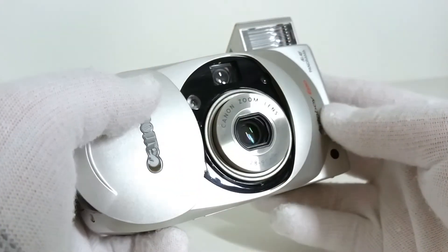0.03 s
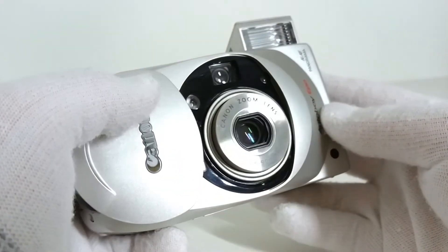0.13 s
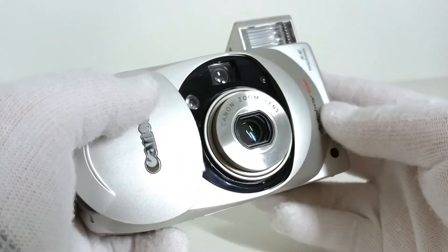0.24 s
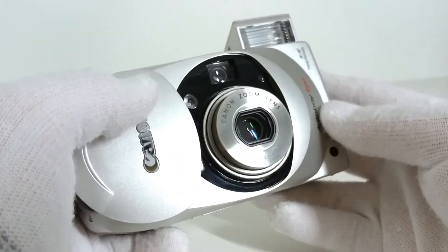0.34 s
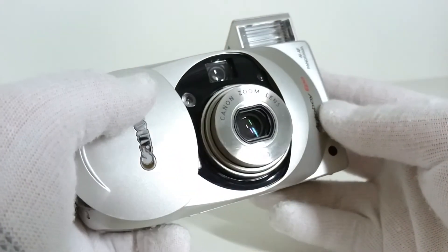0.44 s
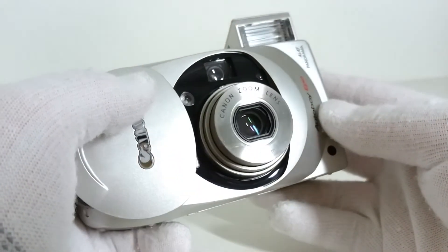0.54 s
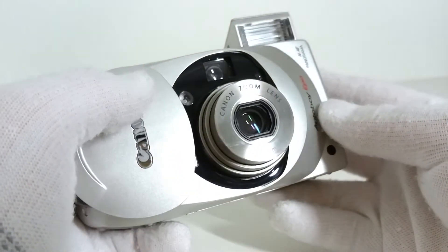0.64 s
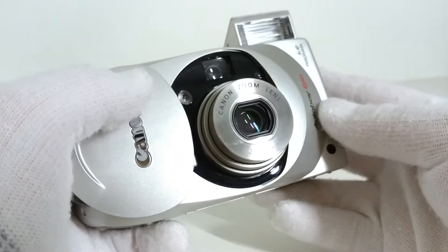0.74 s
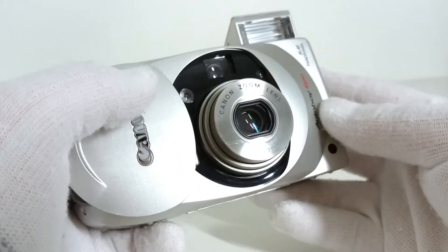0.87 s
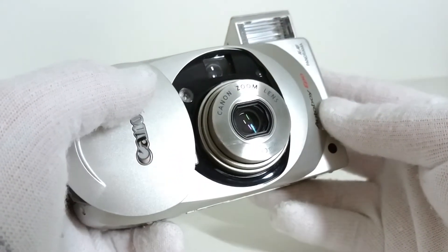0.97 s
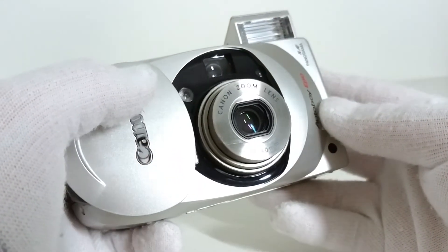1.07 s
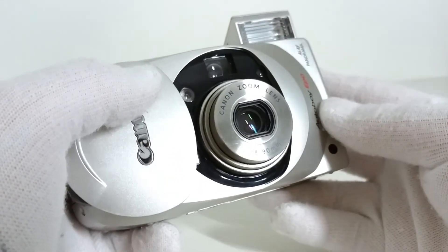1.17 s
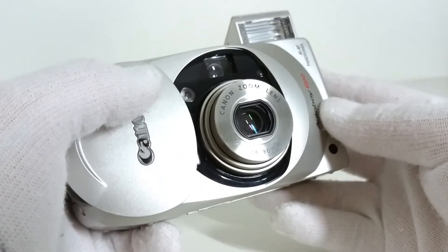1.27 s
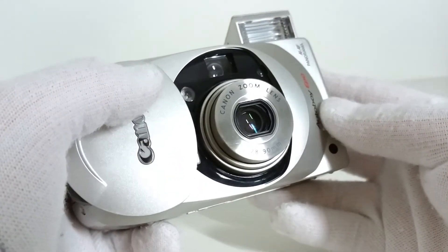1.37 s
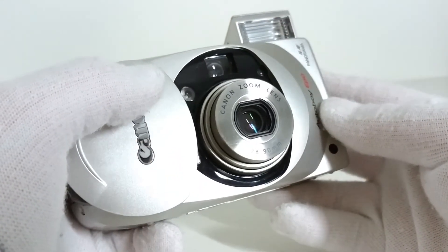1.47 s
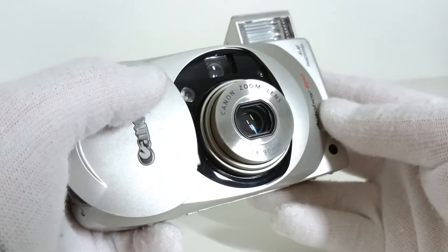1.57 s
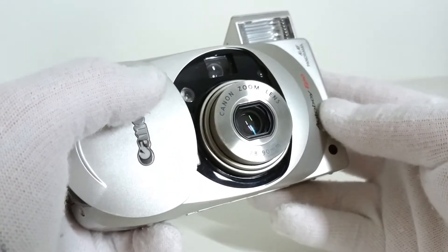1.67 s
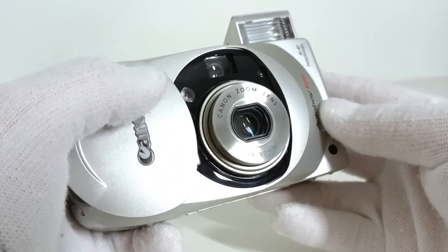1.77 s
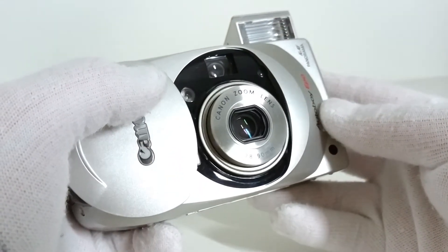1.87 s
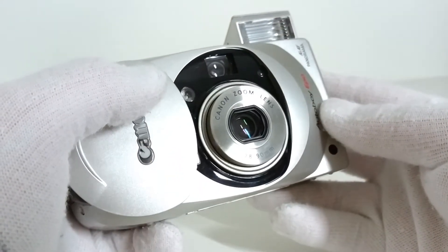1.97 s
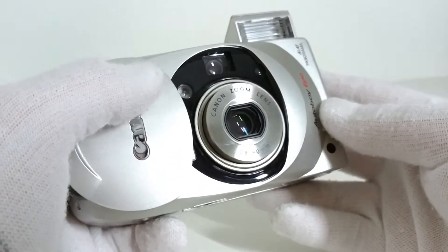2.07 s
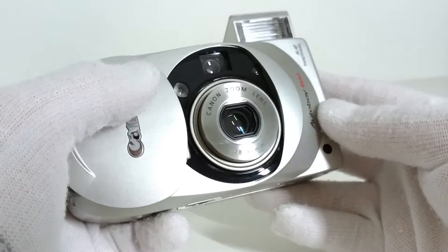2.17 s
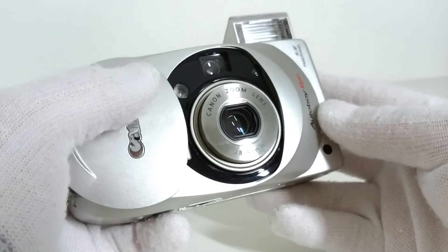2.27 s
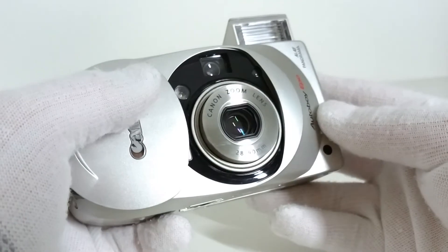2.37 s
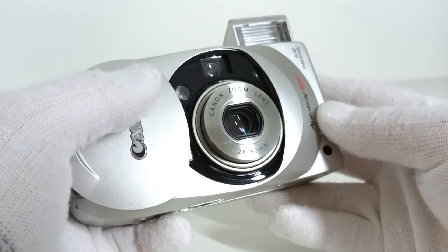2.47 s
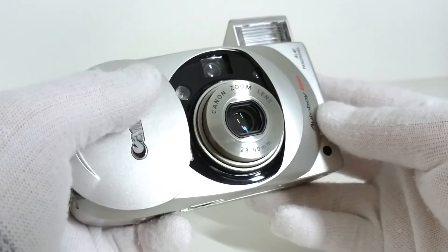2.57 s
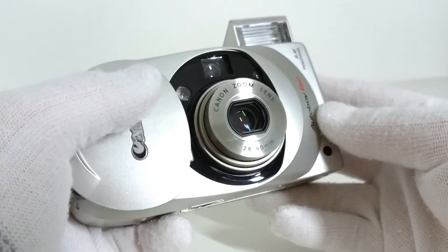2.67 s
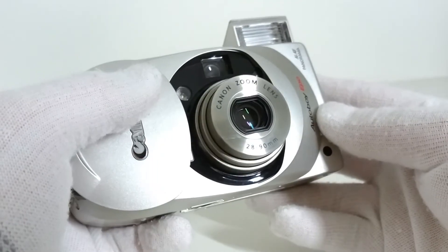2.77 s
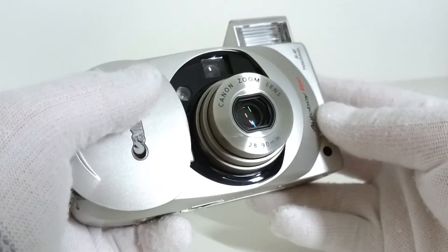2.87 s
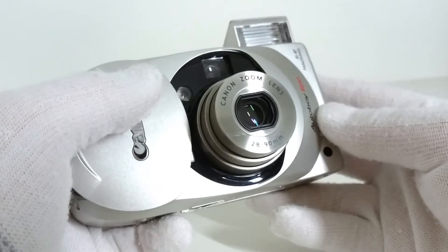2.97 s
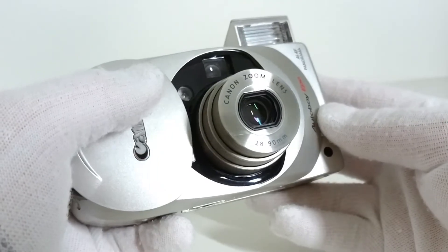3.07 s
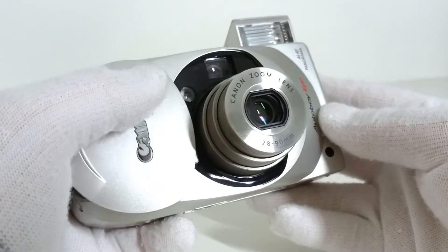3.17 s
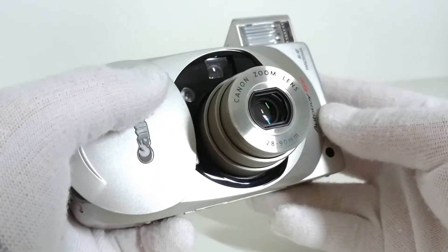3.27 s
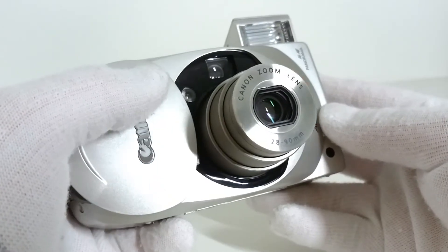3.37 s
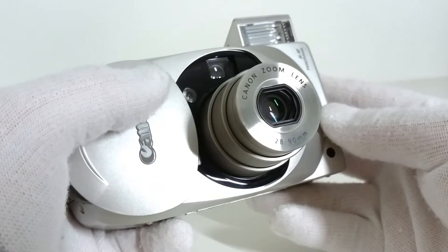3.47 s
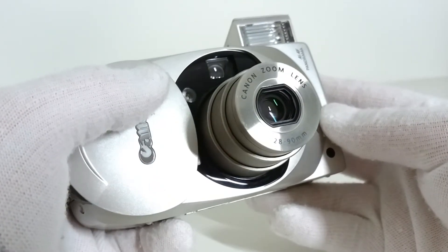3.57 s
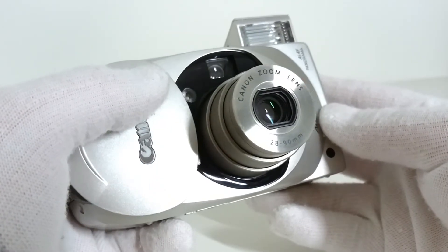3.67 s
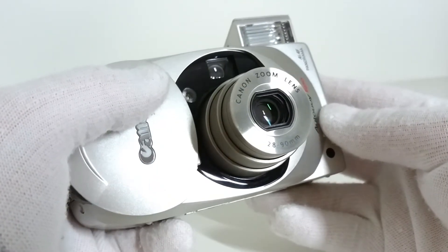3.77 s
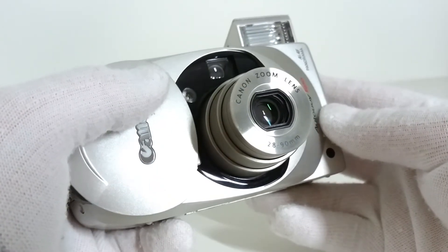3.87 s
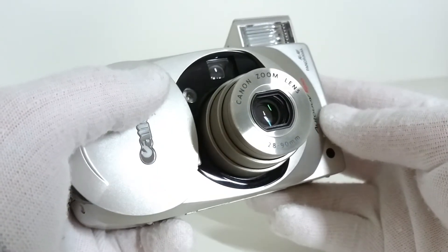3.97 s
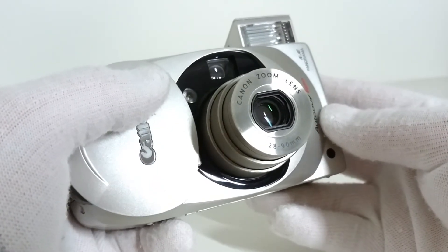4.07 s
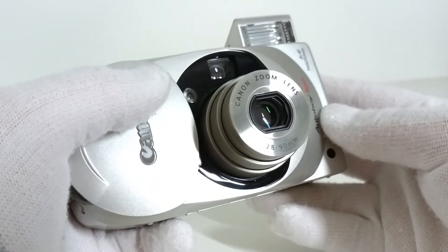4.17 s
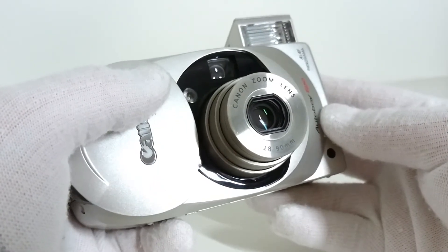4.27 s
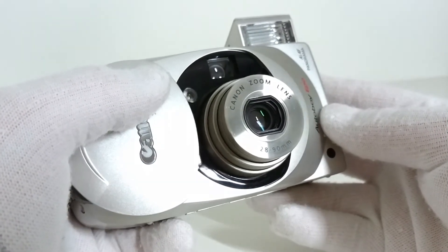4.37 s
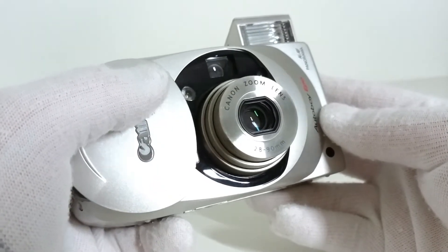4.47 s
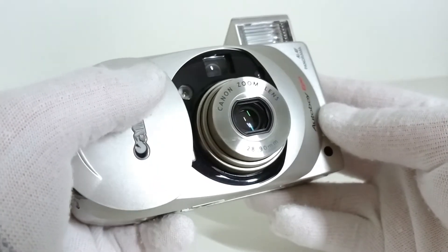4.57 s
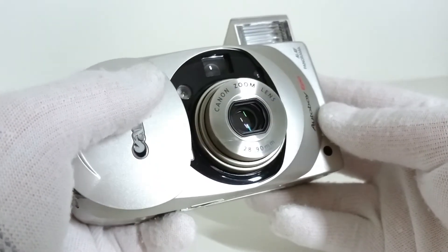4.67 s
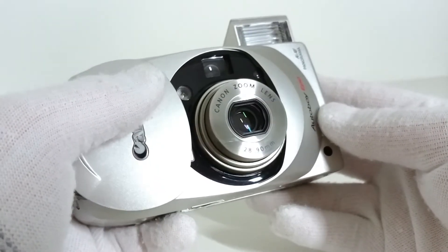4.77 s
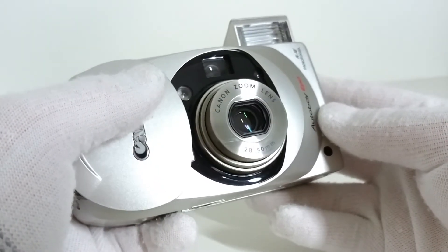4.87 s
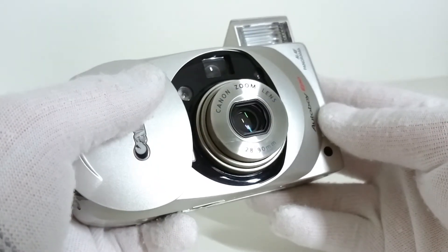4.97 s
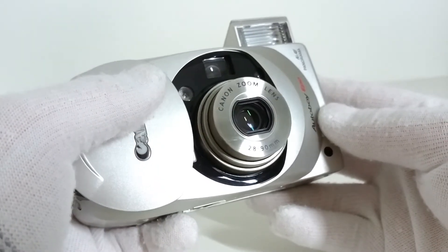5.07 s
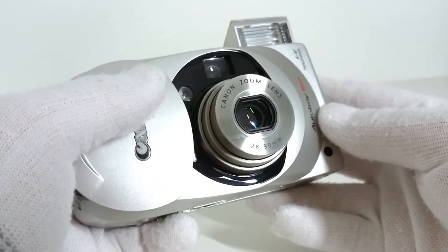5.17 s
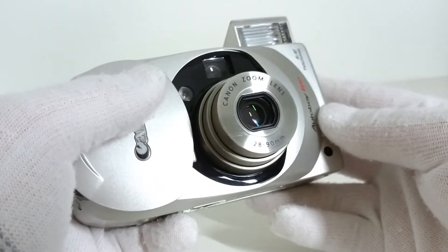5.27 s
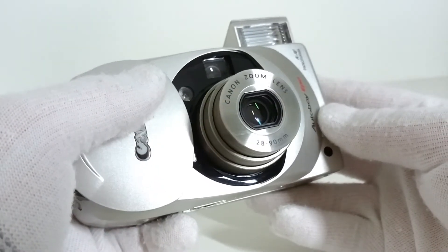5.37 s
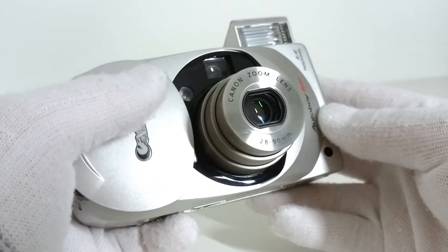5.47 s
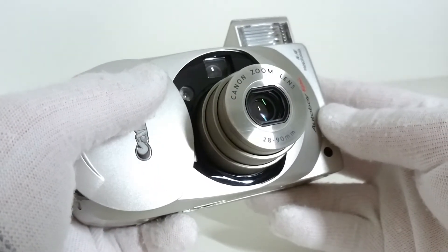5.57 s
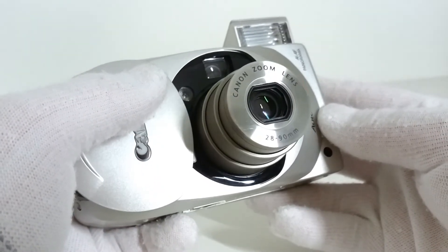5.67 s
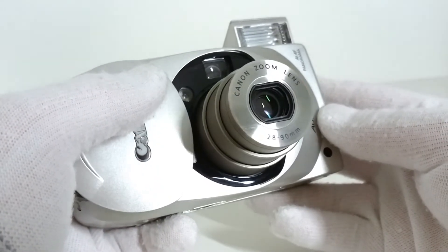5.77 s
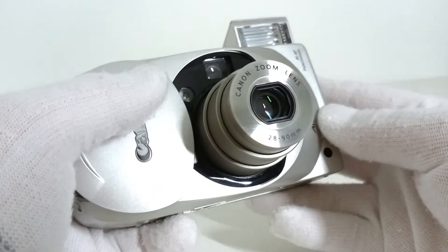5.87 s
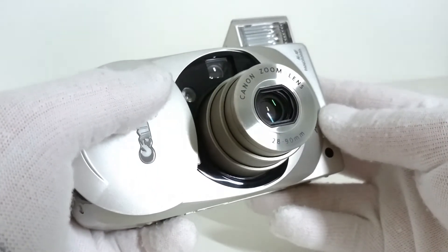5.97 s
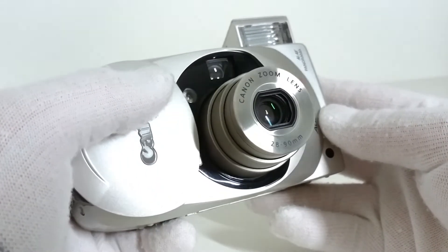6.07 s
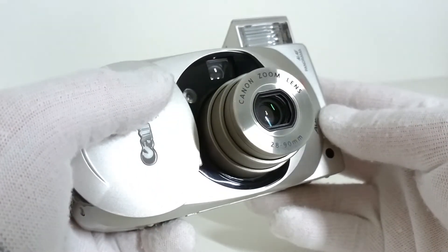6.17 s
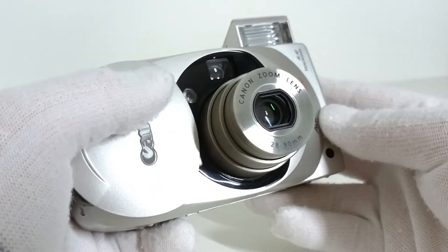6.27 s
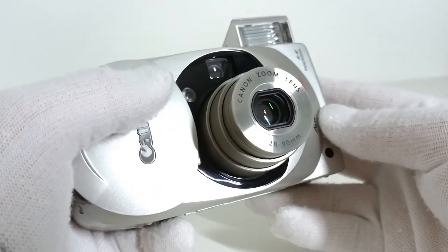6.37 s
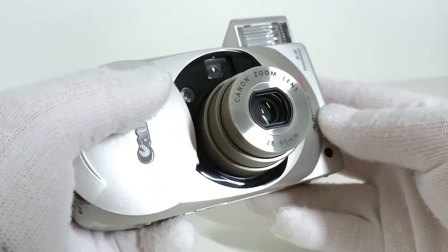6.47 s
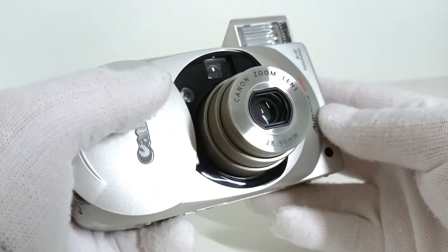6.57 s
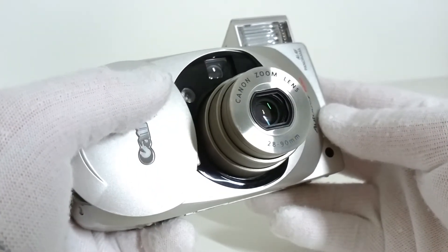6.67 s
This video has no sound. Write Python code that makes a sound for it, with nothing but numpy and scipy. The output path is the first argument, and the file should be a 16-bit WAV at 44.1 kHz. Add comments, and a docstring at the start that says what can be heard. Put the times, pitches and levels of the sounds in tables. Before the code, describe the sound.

A small camera zoom motor whirs in short runs with a thin squeal, plastic clicks and soft handling rumble, close up.

```python
"""Compact camera zoom.

A camera, held close in gloved hands in a small room, zooms out and back in. A tiny motor whines through
plastic gears whose teeth rattle the shell; under load the pinion squeals. Each inward run ends with a
hard brake and a nudge that takes up the gear slack. The lever clicks and the hands rumble softly."""
import sys
import numpy as np
from scipy import signal
from scipy.fft import rfft, irfft
from scipy.io import wavfile
from scipy.ndimage import uniform_filter1d

SR = 44100
rng = np.random.default_rng(int(sys.argv[2]) if len(sys.argv) > 2 else 0)


def output_pcm(signal):
    """Save a mono or channel-first signal as 16-bit PCM at the path in sys.argv[1].

    Samples are clipped to [-1, 1] before scaling.
    """
    pcm = np.clip(np.atleast_2d(signal).T, -1, 1) * 32767
    wavfile.write(sys.argv[1], SR, np.round(pcm).astype(np.int16))


N = 296352
TIME_S = np.arange(N) / SR

# barrel driven out (motor on [s], motor off [s], gear gain [dB], whine gain [dB], squeal gain [dB])
OUT_RUNS = [(0.195, 0.714, -43.5, -48.5, -55.5), (2.397, 3.507, -43, -46.5, -56.5),
            (5.037, 5.807, -43, -46, -54.5)]
# shaft speed the zoom cam allows, one list per outward run (time [s], speed [Hz])
CAM_SPEED = [
    [(0.2, 386.3), (0.355, 441.4), (0.49, 353.3), (0.578, 338.8), (0.712, 343.2)],
    [(2.403, 359.7), (2.563, 450.4), (2.714, 401.1), (2.878, 379.7), (2.913, 362.6), (3.106, 318.7),
     (3.135, 354.2), (3.354, 382.4), (3.505, 414.2)],
    [(5.043, 404.1), (5.224, 434), (5.469, 384.1), (5.652, 391.2), (5.803, 419.8)],
]
# barrel drawn in (start [s], brake [s], top shaft speed [Hz], gain [dB], relative slide hiss [dB])
IN_RUNS = [(0.821, 1.03, 446, -39.5, -26), (1.643, 1.96, 447, -40, -15), (3.606, 3.833, 458, -39.5, -14),
           (4.134, 4.717, 434, -40.5, -10.5), (5.907, 6.133, 462, -40, -13)]
# motor kicks (time [s], gain [dB])
NUDGES = [(1.17, -44.5), (2.098, -45.5), (3.974, -46), (4.858, -45), (6.274, -44.5)]
# tones of the gears, 9-tooth pinion and motor (order [x shaft speed], relative level [dB])
OUT_GEAR_TONES = [(5, -17), (6, -20.5), (7, -20), (12, -15.5), (14, -16), (15, -17.5), (16, -13.5),
                  (19, -9)]
IN_GEAR_TONES = [(6, -20.5), (7, -19), (8, -25.5), (10, -16), (15, -20)]
SQUEAL_TONES = [(9, 2.5), (10, 6.5), (18, 12.5), (27, 7.5), (28, 4), (36, -1)]
IN_WHINE_TONES = [(3, -12), (5, -11.5)]
# spectra of the gears, pinion and sliding barrel (frequency [Hz], relative level [dB])
OUT_GEAR_COLOUR = [(250, -55), (500, -10.5), (750, -0.5), (1100, -7), (1600, -1.5), (2100, -3),
                   (2700, -0.5), (3300, 0.5), (4200, -2.5), (6500, 0.5), (8000, -5.5), (9800, -12),
                   (11500, -17.5), (13000, -17), (15500, -12.5)]
IN_GEAR_COLOUR = [(250, -25), (450, -22), (800, -4.5), (1100, -7.5), (1500, -7.5), (2100, -5), (2700, -7.5),
                  (3300, -5), (4300, -7), (6000, -2.5), (7800, -9.5), (9800, -16), (11600, -22.5),
                  (15500, -13.5)]
SQUEAL_COLOUR = [(2000, -15.5), (2750, -4), (3110, 7.5), (3450, 1.5), (3650, -11), (4100, 2.5), (4500, -15),
                 (9300, -8), (11500, -10)]
SLIDE_COLOUR = [(10000, -57), (12800, -19), (13500, 4), (15800, -6)]
# shell peaks and notches (centre [Hz], width [Hz], lift [dB])
SHELL_RESONANCES = [(1610, 190, 4.5), (2020, 173, -10.5), (2140, 56, 8), (2223, 34, -16), (3123, 110, 10.5),
                    (3464, 270, 4.5), (3565, 54, -13), (4324, 84, -6.5), (4336, 49, 6.5), (4820, 29, -24),
                    (5230, 16, -9), (5700, 48, 1.5), (6430, 56, 5.5), (7530, 42, -4), (9560, 82, 7.5),
                    (10350, 100, 7), (11450, 80, -10), (13500, 100, -12), (14800, 100, 5), (15530, 60, 2)]
# lever and barrel clicks (time [s], ring peak [dB], relative crack gain [dB])
CLICKS = [(0.447, -32, -18), (2.064, -39.5, -30), (2.339, -25.5, -12), (3.11, -30.5, -22),
          (3.511, -35, -26), (4.801, -27, -10.5), (5.643, -33.5, -14), (6.409, -39, -23)]
# modes a click rings (frequency [Hz], relative level [dB], t60 [s])
CLICK_MODES = [(641, -11, 0.064), (721, -3.5, 0.039), (816, -20, 0.032), (1580, -13, 0.027),
               (1770, -3, 0.0086), (2500, -17.5, 0.035), (3400, -16, 0.0097)]
# switch contacts (time [s], gain [dB])
SWITCH_TICKS = [(0.1713, -58), (1.6167, -57), (2.384, -54), (4.113, -48), (5.013, -53)]
# grip changes (middle [s], length [s], level at middle [dB])
GRIP_SHIFTS = [(0.01, 0.026, -46.5), (0.276, 0.084, -52), (0.836, 0.092, -50), (1.303, 0.3, -56.5),
               (1.894, 0.19, -54), (2.22, 0.19, -52), (2.778, 0.053, -48.5), (3.075, 0.16, -52.5),
               (3.766, 0.15, -50), (4.487, 0.21, -49.5), (5.134, 0.31, -54)]
# finger bumps on the case (time [s], envelope peak [dB], frequency [Hz])
FINGER_BUMPS = [(0.8, -33, 168), (1.735, -40, 94.3), (2.065, -40, 114), (3.096, -45.5, 166),
                (3.679, -40, 147), (4.205, -37.5, 171.2), (5.157, -40, 121)]
# glove noise spectra (frequency [Hz], relative level [dB])
GRIP_COLOUR = [(30, -22), (60, 0.5), (110, 2.5), (160, 4.5), (205, -0.5), (280, -9), (500, -46.5)]
RUMBLE_COLOUR = [(20, -55), (45, 6), (70, 2.5), (110, 4.5), (160, 0), (205, -1.5), (280, -9.5),
                 (500, -49.5)]
RUB_COLOUR = [(120, -16), (300, 6.5), (700, 4.5), (1200, -4), (2500, -11), (4500, -33), (15000, -40)]


def zoom_out(start_lag=0.7, spin_up_s=0.051, engage_s=0.03, coast_s=0.064, coast_hz_per_s=2800,
             squeal_speed_hz=354.4, squeal_db_per_hz=0.23):
    """Pushing the barrel loads the motor: speed sags with the cam, poles whine, the pinion squeals."""
    cam_hz = np.interp(TIME_S, *np.vstack(CAM_SPEED).T)
    speed_hz, gear_gain, whine_gain, squeal_gain = np.zeros((4, N))
    for on_s, off_s, gear_db, whine_db, squeal_db in OUT_RUNS:
        spun_up = 1 - start_lag * np.exp(-since(on_s) / spin_up_s)
        run_hz = np.maximum(cam_hz * spun_up - coast_hz_per_s * since(off_s), 0)
        speed_hz = np.where(TIME_S > on_s, run_hz, speed_hz)
        running = ramp(on_s, engage_s) * (1 - ramp(off_s, coast_s))
        gear_gain += undb(gear_db) * running
        whine_gain += undb(whine_db) * running ** 3
        squeal_gain += undb(squeal_db) * (running * spun_up) ** 5
    # judder builds gradually, strongest at one shaft speed
    detune_hz = uniform_filter1d(np.abs(cam_hz - squeal_speed_hz), size=SR // 8)
    squeal_gain *= undb(-squeal_db_per_hz * detune_hz)
    turns = shaft_turns(speed_hz, flutter=0.0022)
    force = gears(speed_hz, turns, OUT_GEAR_TONES, rattle_db=-1.38, wheel_db=-8, waver_db=3.5)
    gear_noise = shell(force, OUT_GEAR_COLOUR)
    return gear_gain * gear_noise + whine_gain * whine(speed_hz, turns) + squeal_gain * squeal(turns)


def zoom_in(lag_hz=245, spin_up_s=0.088, rise_s=0.013, slow_db=-4, stop_t60_s=0.086):
    """Light load: the motor spins up freely, the gears run loose, the sliding barrel hisses."""
    speed_hz, drive_gain, slide_gain = np.zeros((3, N))
    for start_s, brake_s, top_hz, db, slide_db in IN_RUNS:
        lag = np.exp(-since(start_s) / spin_up_s)
        coast = fade(since(brake_s), stop_t60_s)
        speed_hz = np.where(TIME_S > start_s, (top_hz - lag_hz * lag) * coast ** 0.2, speed_hz)
        drive_gain += undb(db + slow_db * lag) * ramp(start_s, rise_s) * coast
        slide_gain += undb(db + slide_db) * (1 - lag) * coast
    turns = shaft_turns(speed_hz, flutter=0.00317)
    force = gears(speed_hz, turns, IN_GEAR_TONES, rattle_db=-2.5, wheel_db=-19, waver_db=2)
    hiss = shell(rattle(turns, spread_db=0, throb=0.23), SLIDE_COLOUR)
    whine_gain = np.clip((speed_hz - 280) / 140, 0, 1)
    motor = whine_gain * mesh(turns, IN_WHINE_TONES, waver_db=1.2, runout=0.2)
    return drive_gain * (shell(force, IN_GEAR_COLOUR) + motor) + slide_gain * hiss


def shaft_turns(speed_hz, flutter):
    """Turns made by a shaft whose speed flutters slightly."""
    return np.cumsum(speed_hz * (1 + flutter * drift(81.5))) / SR


def gears(speed_hz, turns, tones, rattle_db, wheel_db, waver_db, pinion_db=-16):
    """Gear force: loose rattle, joined at speed by tooth tones and each wheel's repeating pattern."""
    wheel = undb(wheel_db) * tooth_errors(turns / 5, harmonics=220)
    pinion = undb(pinion_db) * tooth_errors(turns, harmonics=44)
    teeth = mesh(turns, tones, waver_db, runout=0.092)
    loose = undb(rattle_db + 0.17 * drift(150)) * rattle(turns, spread_db=1, throb=0.17)
    engaged = np.clip((speed_hz - 255) / 105, 0, 1)
    return loose + engaged * (pinion + wheel + teeth)


def mesh(turns, tones, waver_db, runout):
    """Shaft-order tones; an off-centre wheel, five times slower, varies the tooth pressure."""
    out = 0
    for order, db in tones:
        pressure = 1 + runout * tooth_errors(turns / 5, harmonics=4)
        gain = pressure * undb(db + waver_db * drift(47))
        out += gain * np.sin(2 * np.pi * (order * turns + rng.random()))
    return out


def tooth_errors(turns, harmonics, size=8192):
    """A wheel's unevenness: a random pattern that repeats every turn."""
    pattern = irfft(np.r_[0, np.exp(2j * np.pi * rng.random(harmonics))], size)
    return unit_rms(np.interp(turns, np.arange(size) / size, pattern, period=1))


def rattle(turns, spread_db, throb):
    """Dense tiny impacts, bunched once a turn and at each of the three rotor poles."""
    hits = (rng.random(N) < 0.2) * noise() * undb(spread_db * noise())
    bunching = np.cos(2 * np.pi * turns) + np.cos(2 * np.pi * 3 * turns)
    return unit_rms(hits * np.exp(throb * bunching))


def whine(speed_hz, turns):
    """Tones of the loaded three-pole motor; three of them swell as they pass shell resonances."""
    order_db = {
        3: 3 + drift(45),
        4: np.interp(speed_hz, [330, 385, 430], [-11, 1, -5]) + 2.8 * drift(32),
        8: np.interp(speed_hz, [328, 382, 390, 402, 435], [-5.5, -2.5, 4.5, -3, -10]) + 2 * drift(33),
        9: np.interp(speed_hz, [395, 422, 440], [-25, -3, -8]) + 2 * drift(33)}
    tones = sum(undb(db) * np.sin(2 * np.pi * order * turns) for order, db in order_db.items())
    return np.clip((speed_hz - 260) / 50, 0, 1) * tones


def squeal(turns, judder_db=0.5):
    """Loaded pinion teeth stick and judder in the slow wheel, ringing the shell near 3 kHz."""
    judder = undb(judder_db) * tooth_errors(turns / 5, harmonics=60)
    teeth = mesh(turns, SQUEAL_TONES, waver_db=2.5, runout=0.35)
    return colour(teeth + judder, SQUEAL_COLOUR)


def shell(force, outline, ring_gain=0.34, t60_s=0.015):
    """The case radiates a force through its main resonances and a short ring of many small modes."""
    ring = noise(SR // 20) * fade(TIME_S[:SR // 20], t60_s)
    vibration = force + ring_gain * convolve(force, ring)
    return colour(vibration / np.hypot(1, ring_gain), outline, SHELL_RESONANCES)


def brakes(boost_db=3, rise_s=0.00076, hold_s=0.015, t60_s=0.075):
    """The stopping motor throws the teeth against their other flanks."""
    gain = sum(undb(db + boost_db) * ramp(brake_s, rise_s) * fade(since(brake_s + hold_s), t60_s)
               for _, brake_s, _, db, _ in IN_RUNS)
    return gain * colour(noise(), IN_GEAR_COLOUR, [(955, 210, 7.7), (1527, 260, 15.3), (3300, 500, 6)])


def nudges(rise_s=0.021, coast_t60_s=0.2, roll_s=0.11, rest_t60_s=0.29, speed_hz=130):
    """Brief motor kicks take up the slack; the gears coast, then come to rest."""
    gain = 0
    for start_s, db in NUDGES:
        coast = fade(since(start_s + rise_s), coast_t60_s)
        settle = fade(since(start_s + roll_s), rest_t60_s)
        gain += undb(db) * ramp(start_s, rise_s) * coast * settle
    grind = undb(0.97 * drift(160)) * rattle(speed_hz * TIME_S, spread_db=3.5, throb=0.065)
    resonances = [(1370, 1400, 7.8), (3260, 280, 9.1), (11500, 1600, 0.68)]
    return gain * colour(grind, IN_GEAR_COLOUR, resonances)


def clicks(crack_t60_s=0.029, rise_s=0.0005):
    """Plastic parts snap home: a short crack and a few quickly damped modes."""
    out, age_s = np.zeros(N), TIME_S[:SR // 10]
    ring = sum(undb(db) * np.sin(2 * np.pi * hz * age_s) * fade(age_s, t60_s)
               for hz, db, t60_s in CLICK_MODES)
    ring *= np.minimum(age_s / rise_s, 1)
    ring /= np.abs(ring).max()
    for start_s, db, crack_db in CLICKS:
        crack = 0.5 * noise(len(age_s)) * fade(age_s, crack_t60_s)
        add(out, start_s, undb(db) * (ring + undb(crack_db) * crack))
    return out


def switch_ticks(t60_s=0.051, trim_db=-8):
    """Light contacts close with a thin tick just before the motor starts."""
    gain = sum(undb(db + trim_db) * (TIME_S > start_s) * fade(since(start_s), t60_s)
               for start_s, db in SWITCH_TICKS)
    return gain * colour(noise(), [(2000, 1), (5500, -1), (8000, -2), (15000, -13)])


def hands(rumble_db=-57.5, rub_db=-63, bump_rise_s=0.0065):
    """Gloves rumble and rub on the case and creak dully as the grip shifts; fingers bump it."""
    grip_gain = sum(undb(db) * np.exp(-2 * ((TIME_S - middle_s) / length_s) ** 2)
                    for middle_s, length_s, db in GRIP_SHIFTS)
    creak = grip_gain * colour(noise(), GRIP_COLOUR, [(157, 21, 3.8)])
    rumble = undb(rumble_db + 2 * drift(23)) * colour(noise(), RUMBLE_COLOUR, [(155.4, 16, 3.1)])
    rub = undb(rub_db + 2 * drift(37) + 2.3 * drift(42)) * colour(noise(), RUB_COLOUR)
    out = creak + rumble + rub
    age_s = TIME_S[:SR // 10]
    swell = (age_s / bump_rise_s * np.exp(1 - age_s / bump_rise_s)) ** 2
    for start_s, db, hz in FINGER_BUMPS:
        add(out, start_s, undb(db) * swell * np.sin(2 * np.pi * hz * age_s))
    return out


def room(x, near_db=-21, near_t60_s=0.25, late_db=-36, late_t60_s=2.5):
    """Adds a short diffuse tail from near walls and a fainter, longer, duller one."""
    age_s = TIME_S[:SR]
    onset = np.minimum(age_s / 0.01, 1)
    near = convolve(x, noise(SR) * onset * fade(age_s, near_t60_s))
    late = convolve(x, noise(SR) * onset * fade(age_s, late_t60_s))
    late = colour(late, [(700, -1), (3000, 6), (8000, -13), (15000, -15)])
    return x + undb(near_db) * near + undb(late_db) * late


def microphone_hiss(level_db=-90):
    """Faint steady white noise."""
    return undb(level_db) * noise()


def colour(x, outline, resonances=()):
    """Filter by outline (frequency [Hz], level [dB]) and peaks (centre [Hz], width [Hz], lift [dB])."""
    hz = np.maximum(np.fft.rfftfreq(N, 1 / SR), 1)
    outline_hz, outline_db = np.transpose(outline)
    db = np.interp(np.log(hz), np.log(outline_hz), outline_db)
    for centre_hz, width_hz, lift_db in resonances:
        db += lift_db / (1 + (2 * (hz - centre_hz) / width_hz) ** 2)
    return irfft(rfft(x) * unit_rms(undb(db)), N)  # white noise keeps its level


def drift(rate_hz):
    """Smooth random drift, rms 1."""
    size = int(SR / rate_hz)
    smoothed = uniform_filter1d(noise(), size, mode="wrap")
    return unit_rms(uniform_filter1d(smoothed, size, mode="wrap"))


def convolve(x, response):
    return signal.fftconvolve(x, response / np.linalg.norm(response))[:N]


def noise(samples=N):
    return rng.standard_normal(samples)


def undb(db):
    return 10 ** (db / 20)


def unit_rms(x):
    return x / np.sqrt(np.mean(x ** 2) + 1e-20)


def since(start_s):
    return np.maximum(TIME_S - start_s, 0)


def ramp(start_s, rise_s):
    return np.minimum(since(start_s) / rise_s, 1)


def fade(age_s, t60_s):
    return np.exp(-np.log(1000) * age_s / t60_s)


def add(track, start_s, sound):
    i = int(start_s * SR)
    track[i:i + len(sound)] += sound[:N - i]


def scene():
    """One source position, identical in both channels."""
    camera = zoom_out() + zoom_in() + brakes() + nudges() + clicks() + switch_ticks()
    sound = room(camera + hands()) + microphone_hiss()
    return np.array([sound, sound])


def record(dry):
    """Steep low-pass at 15.7 kHz."""
    return signal.sosfilt(signal.ellip(10, 0.2, 70, 15700, fs=SR, output="sos"), dry)


dry = scene()
out = record(dry)
output_pcm(out)
```